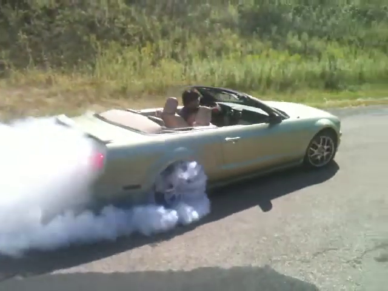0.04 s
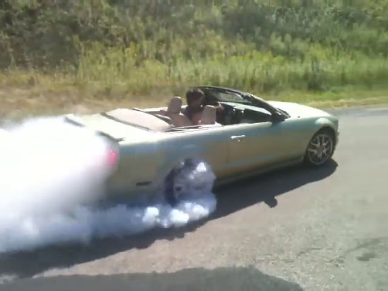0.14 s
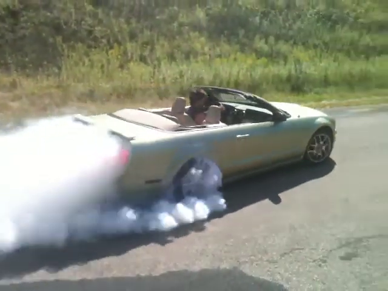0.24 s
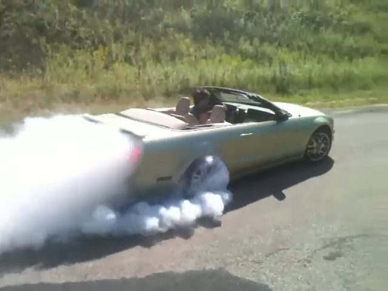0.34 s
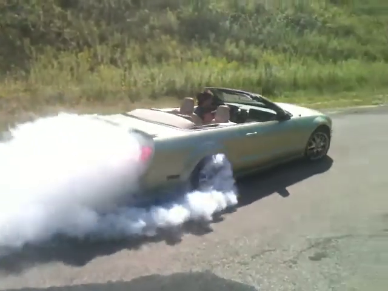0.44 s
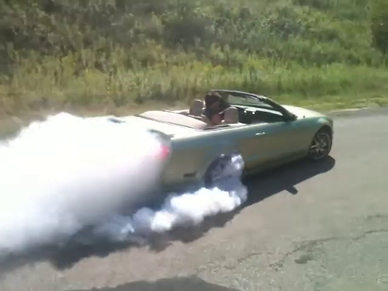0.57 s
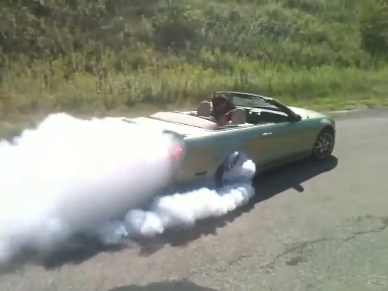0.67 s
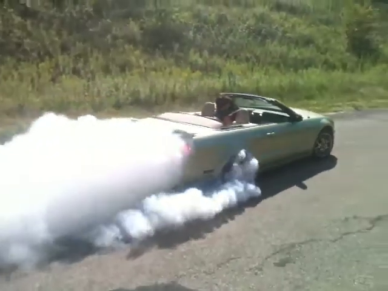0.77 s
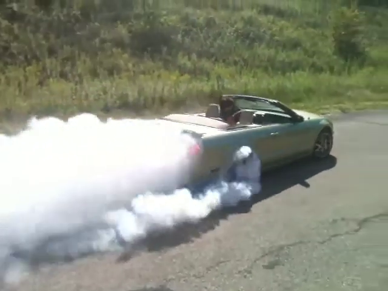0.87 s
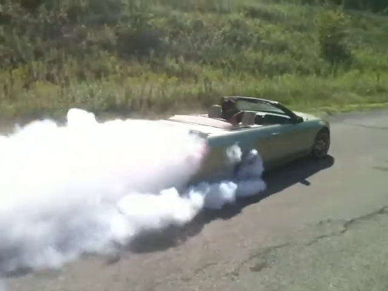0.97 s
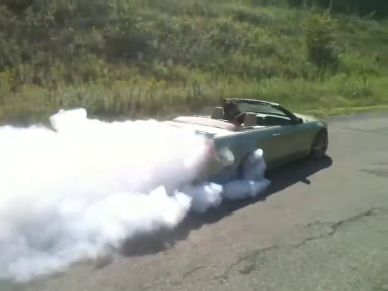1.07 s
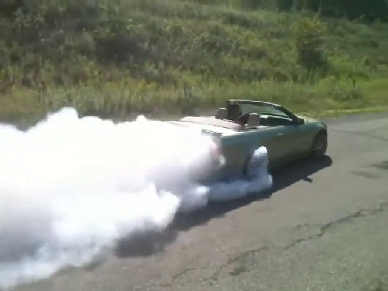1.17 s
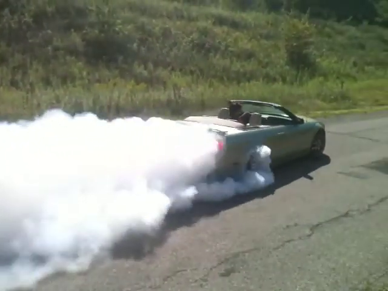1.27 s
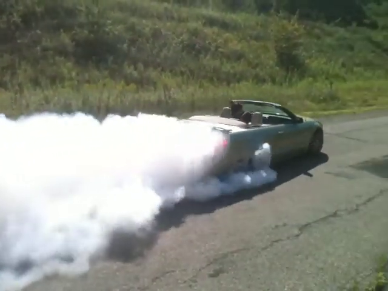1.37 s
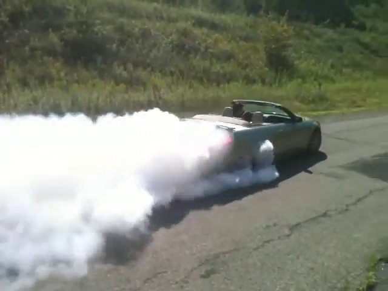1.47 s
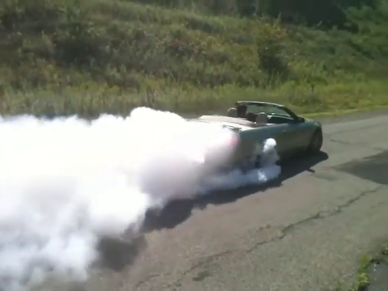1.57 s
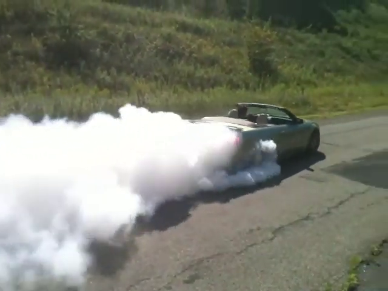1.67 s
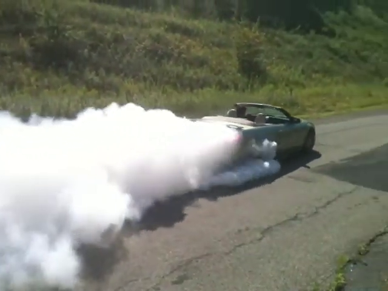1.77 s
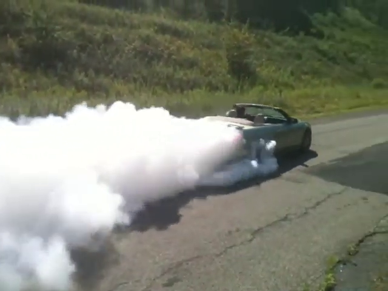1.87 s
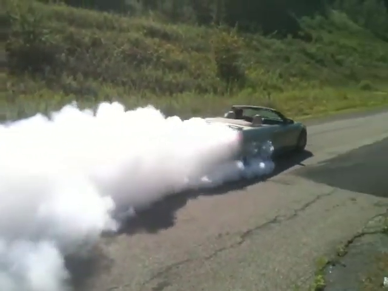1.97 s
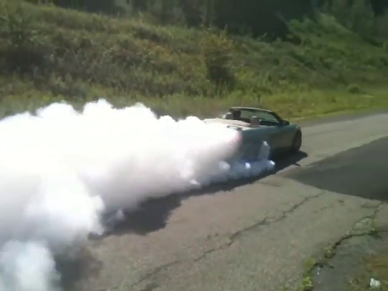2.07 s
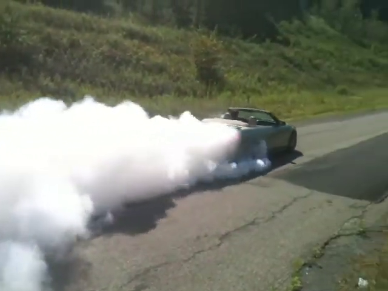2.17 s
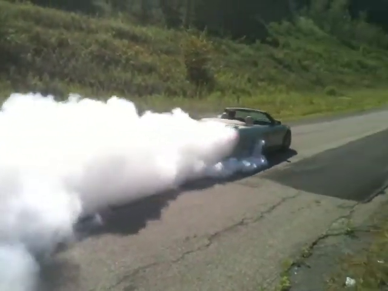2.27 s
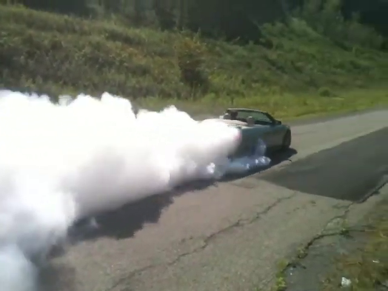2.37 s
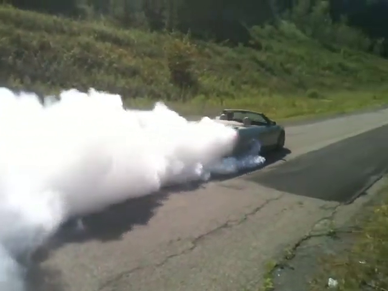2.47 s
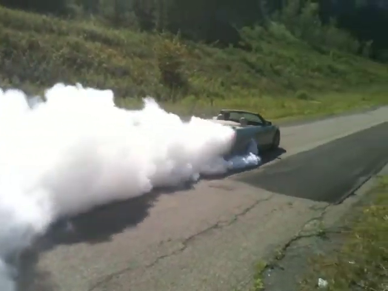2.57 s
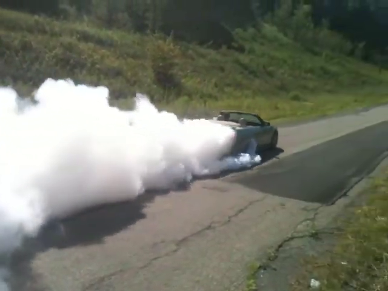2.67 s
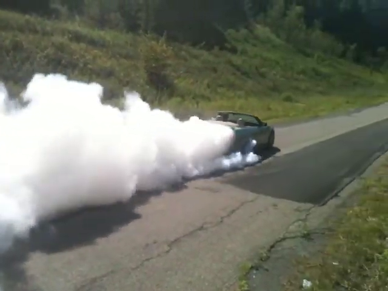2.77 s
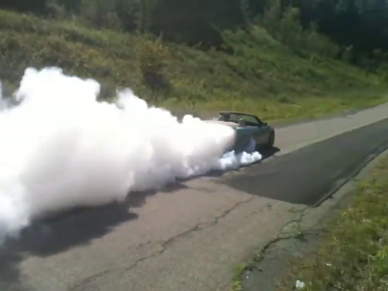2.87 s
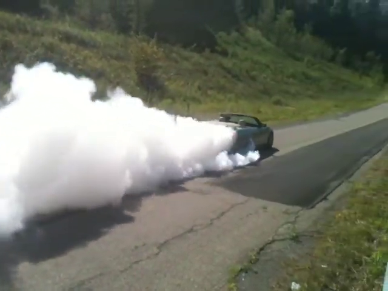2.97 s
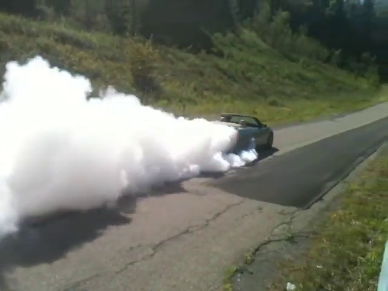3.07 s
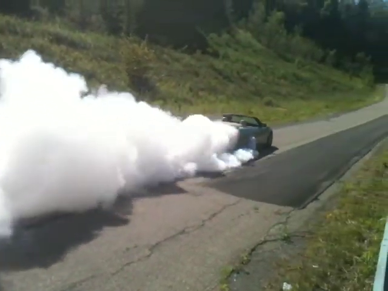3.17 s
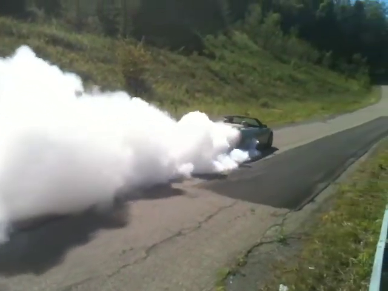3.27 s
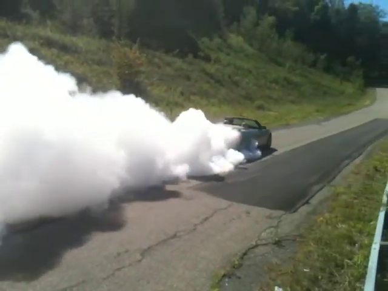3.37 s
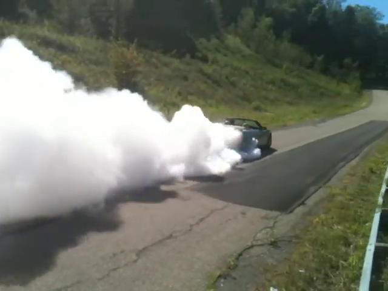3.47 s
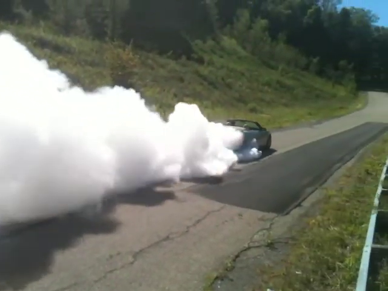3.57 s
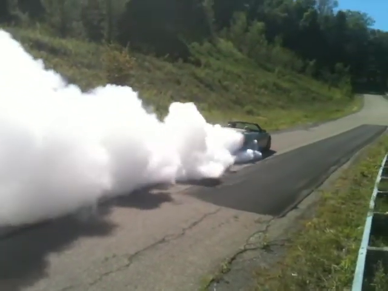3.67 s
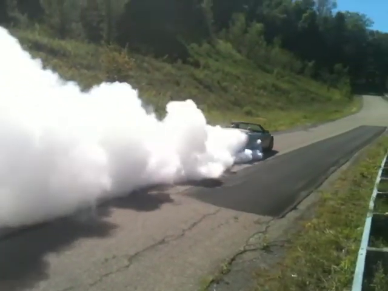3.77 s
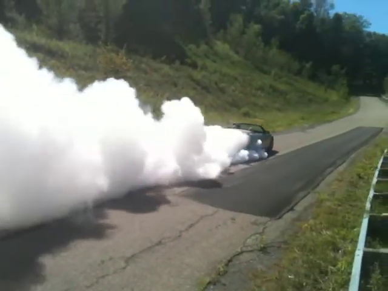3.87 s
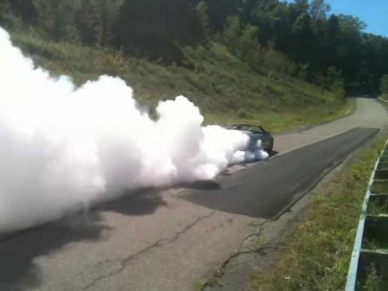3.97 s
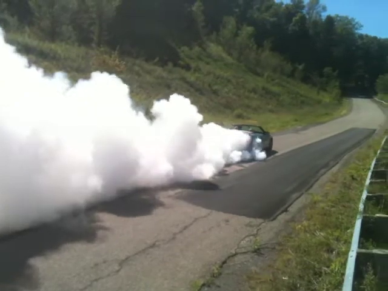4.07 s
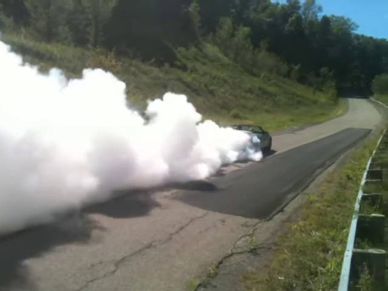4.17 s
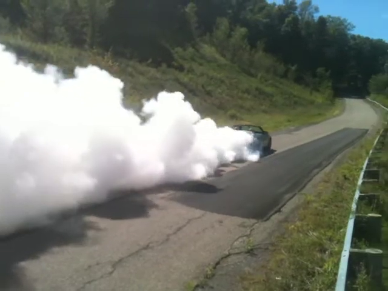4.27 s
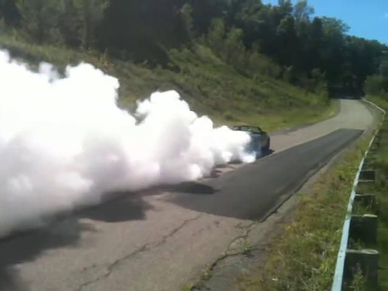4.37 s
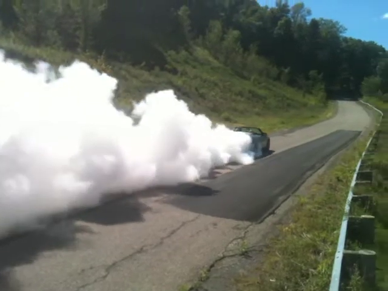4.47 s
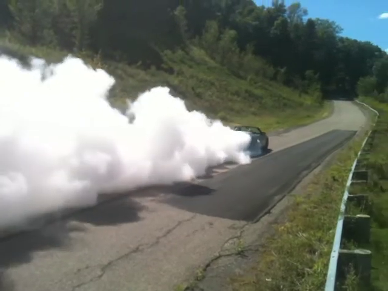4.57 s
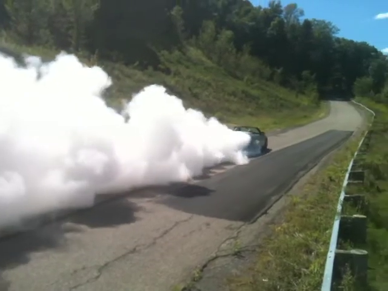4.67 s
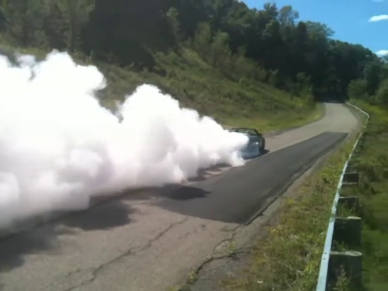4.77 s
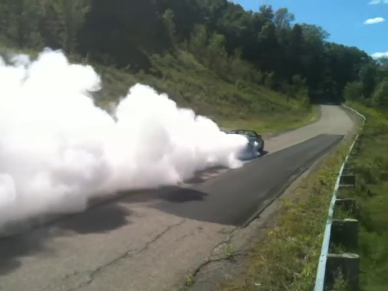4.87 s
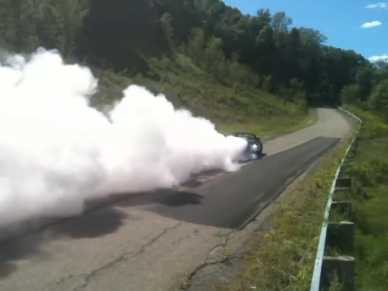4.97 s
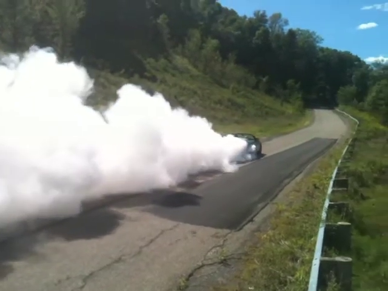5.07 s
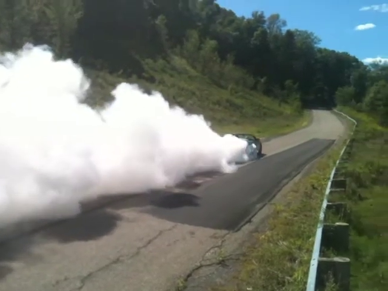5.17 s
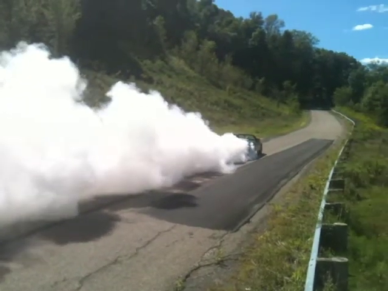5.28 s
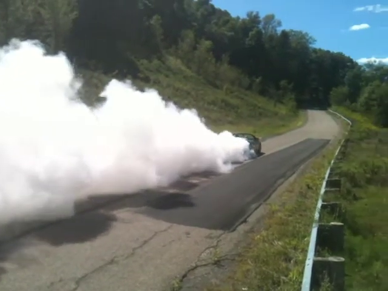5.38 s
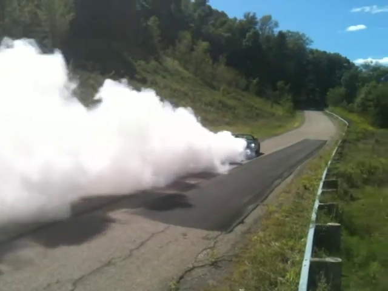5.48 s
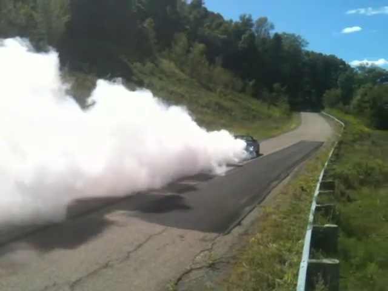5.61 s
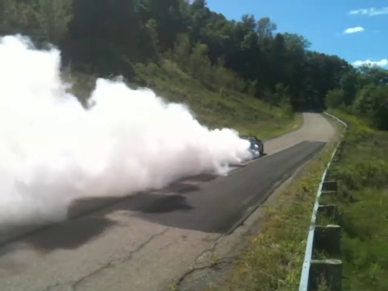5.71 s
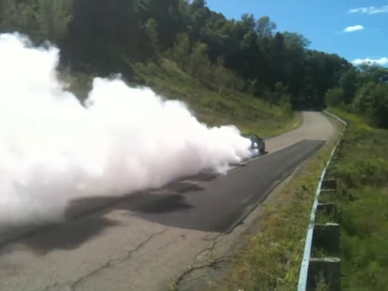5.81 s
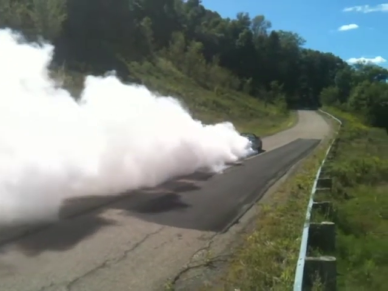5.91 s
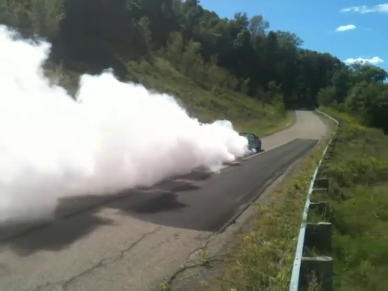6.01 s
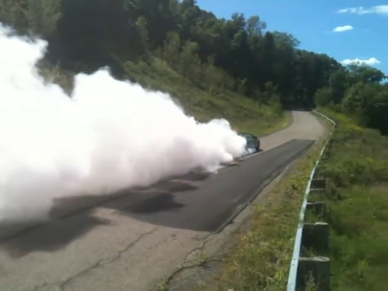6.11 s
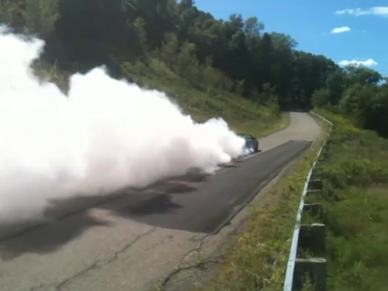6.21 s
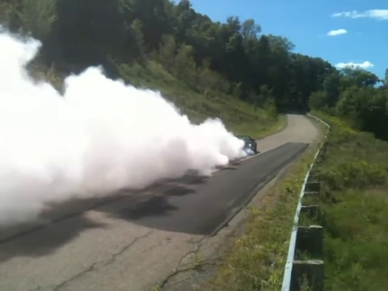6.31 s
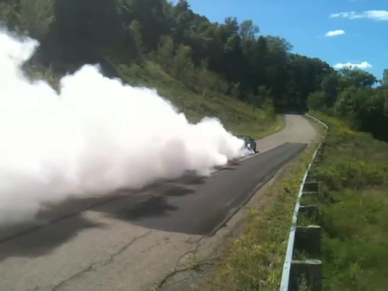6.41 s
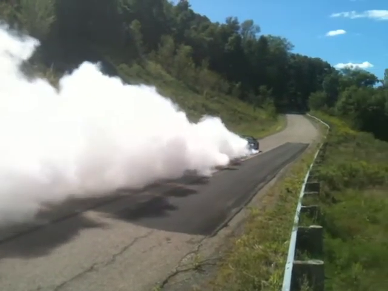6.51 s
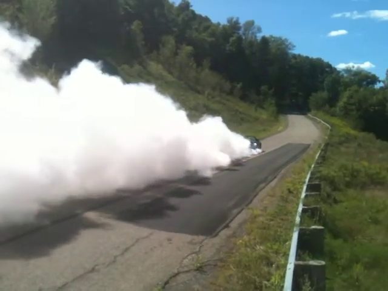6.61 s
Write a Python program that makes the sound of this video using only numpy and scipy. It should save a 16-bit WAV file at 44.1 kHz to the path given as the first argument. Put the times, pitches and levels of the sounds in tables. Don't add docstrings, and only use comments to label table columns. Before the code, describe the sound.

A loud, lumpy V8 held at high revs starts at full force, close and distorted, its spinning tyres squealing and scrubbing. Sharp ragged pops ride on the exhaust for the first few seconds. As the rear turns towards the microphone the roar changes colour and the squeal stands out more; then everything dwindles down the road in dry open air, with very faint insects and leaves beneath.

```python
import sys
import numpy as np
from scipy import signal
from scipy.fft import rfft, irfft, next_fast_len
from scipy.io import wavfile
from scipy.ndimage import uniform_filter1d, map_coordinates

SR = 44100
rng = np.random.default_rng(int(sys.argv[2]) if len(sys.argv) > 2 else 0)


def dump(signal):
    limited = np.clip(np.atleast_2d(signal).T, -1, 1)
    pcm = np.round(limited * 32767).astype(np.int16)
    wavfile.write(sys.argv[1], SR, pcm)


def convert_level_to_amplitude(level_db):
    exponent = np.asarray(level_db, float) / 20
    return 10 ** exponent


N = 293265
T = np.arange(N) / SR

# t/s, engine cycle f/Hz, extra path from far tailpipe/m, level/dB, brightness/(dB per octave)
DRIVE = [(0.0, 49.42, 0.95, 2.5, -3.5), (0.6, 48.57, 0.71, 4, 1), (0.9, 47.98, 0.74, 4, 0.2),
         (1.2, 47.6, 0.71, 3, 1.3), (1.5, 47.26, 0.63, 3, 1.2), (1.8, 46.98, 0.47, 3, 1),
         (2.1, 46.97, 0.34, 3.5, 0.5), (2.5, 46.45, 0.32, 3, 1.3), (2.87, 46.58, 0.24, 1.3, 1.4),
         (3.03, 45.84, 0.232, 1.1, 0.9), (3.3, 46.01, 0.205, -0.55, 0.3), (4.0, 45.34, 0.12, -1.4, 0.5),
         (4.5, 44.44, 0.036, -3, 0.5), (5.0, 43.75, -0.04, -5, -0.9), (5.5, 43.46, -0.072, -6.5, -1),
         (6.0, 43.23, -0.053, -8, -1), (6.3, 43.6, -0.059, -9.5, -2), (6.65, 44.3, 0.009, -8.5, 1)]
# t/s, distance/m
DISTANCE = [(0, 4.34), (.8, 5.66), (1.5, 9.7), (2.3, 10.5), (2.9, 15.7), (3.7, 14.7), (4.3, 18.9),
            (5.2, 25.4), (6, 29.3), (6.65, 31.2)]
# near pipe level/dB, far pipe level/dB, far pipe's lead/turns
PIPE_ORDERS = [(-50.5, -50, .17), (-27.5, -26.5, 0.42), (-34.5, -27, 0.88), (-33.5, -29.5, .49),
               (-45.5, -27, .67), (-43.5, -30, 0.0092), (-21.5, -20.5, 0.92), (-35, -29.5, 0.36),
               (-37.5, -38.5, 1), (-37, -41, 0.9), (-30.5, -37.5, .84), (-41.5, -37.5, 0.5),
               (-32.5, -39.5, 0.9), (-47.5, -37, 0.5), (-31.5, -38, .67), (-36, -55, 0.48),
               (-41.5, -52, .75), (-39.5, -41.5, .59), (-41.5, -49.5, 0.65), (-45, -48.5, .68),
               (-43, -54, 0.46), (-49, -60, .49), (-46.5, -53.5, .61), (-43, -60, 0.51)]
# change of near pipe level/dB, change of far pipe level/dB
SIDE_CHANGES = [(-1.5, -0.8), (1, -3), (1.5, -5.5), (0.5, 5), (-.5, -0.5), (-1.5, -7.5), (2.5, -1),
                (1.2, 1.5), (1.3, -4), (-3.5, -13.5), (-1, 6), (-7, 1), (-1.7, 4), (5.5, 2.5), (-4, -12.5),
                (5.5, 7), (1.5, -9), (5, -12.5), (8.5, 18.5), (2.5, 3), (-3.8, -15.5), (2, 3.5), (4.5, 1),
                (5, -1.3)]
FIRING_STRENGTHS = [3, -2.8, -0.8, -3.5, -0.5, -2, -3.5, -0.8]
# f/Hz, level/dB
ROAR_SIDE = [(60, -42.5), (110, -30), (250, -10.5), (500, -16.5), (900, -16.5), (1400, -18.5), (1700, -25),
             (2100, -27), (2500, -39.5), (3000, -56)]
ROAR_BEHIND = [(60, -41), (110, -23), (250, -13.5), (500, -16.5), (750, -15.5), (1030, -21), (1400, -16),
               (1500, -24), (1630, -36.5), (1850, -23), (2080, -28.5), (2280, -45), (2600, -43.5),
               (3000, -68.5)]
# f/Hz, level/dB
HISS_SIDE = [(1000, -23), (1500, -4), (2400, -1.5), (3300, -1.5), (4200, -5), (5500, -12.5), (7500, -19.5),
             (10000, -39.5)]
HISS_BEHIND = [(1500, -32), (2000, -2.5), (2300, -7.5), (2650, -4.5), (3080, -7.5), (3550, 2), (3950, -2),
               (4200, -4), (4450, -8), (4750, -8), (5050, -11), (5350, -15), (6200, -14.5), (7400, -30)]
# t/s, lift level/dB, length/s
SMOKE_GAPS = [(.28, 2, .06), (.45, 2.5, .06), (.92, 1, .05), (2.26, 2.5, .04), (2.67, 2, 0.054),
              (2.8, 2, 0.026), (3.2, 2.5, 0.058), (3.66, 2, 0.056), (4.1, 7, .045), (4.5, 5, .025),
              (4.62, 4, .05), (5.07, 4.5, .05), (5.53, 2.5, .04), (6.19, 4, .04), (6.52, 5, 0.054)]
# t/s, lift level/dB, length/s
THIN_SMOKE = [
    (1.4, 0.5, .4),
    (3.7, 3, .3),
    (5.1, 2.5, .15),
    (6.4, 0, .2),
]
# f/Hz, level/dB
SCRUB_SIDE = [(4000, -18.5), (5200, -1.5), (7000, -5.5), (8500, -9), (11000, -8.5), (13200, -11.5),
              (14500, -16.5), (15800, -26)]
SCRUB_BEHIND = [(4000, -21.5), (5200, -3), (6900, -6.5), (7400, -12), (7900, -8), (8600, -10),
                (8900, -17.5), (9300, -7), (11000, -12.5), (13200, -13.5), (13700, -23.5), (14800, -24),
                (15100, -12.5), (15800, -29.5)]
# t/s, lift level/dB, length/s
TYRE_BITES = [(.11, 3.5, 0.051), (.28, 6, 0.046), (.47, 9, 0.042), (.93, 7, 0.054), (1.17, 3, 0.09),
              (1.48, 4.5, 0.097), (1.77, 7, .06), (1.87, 3.5, 0.041), (1.98, 7.5, 0.039), (2.6, 1, 0.086),
              (2.8, 5, .15), (3.04, 6, 0.074), (3.9, 3.5, .1), (4.5, 5, 0.048)]
# f/Hz, level/dB
MEADOW_COLOUR = [(60, -37.5), (300, -6.5), (2000, -7.5), (6800, -5.5), (7400, -11.5), (8300, 5), (9000, -3),
                 (13200, -12), (13800, -21.5), (14800, -23), (15100, -15.5), (15800, -23)]
# place in the cycle/turns, start t/s,
# slightly eased t/s, end t/s, level/dB
SHOCK_FRONTS = [
    (0.55, .5, 1.5, 3.2, -3),
    (.615, 0.25, 1.1, 2.5, 1),
    (.68, 0.3, 1.2, 3.7, -0.5),
]
# t/s, level/dB
STRAY_SHOCKS = [
    (2.805, -3),
    (2.66, -5),
]
# f/Hz, level/dB
SHOCK_COLOUR = [(600, -16.5), (1300, 4), (2500, -9.5), (4500, -18.5), (8000, -30), (15000, -44.5)]

TAIL_SWINGS_S = (0.65, 2.04)


def unit(x):
    return x / np.sqrt(np.mean(x ** 2) + 1e-20)


def curves(rows):
    times, *columns = np.transpose(rows)
    return [np.interp(T, times, column) for column in columns]


def wobble(rate_hz):
    knots = rng.standard_normal(int(N * rate_hz / SR) + 4)
    return map_coordinates(knots, [np.arange(N) * rate_hz / SR])


def filtered(x, response):
    size = next_fast_len(N + 8192)
    spectrum = rfft(x, size) * response(np.fft.rfftfreq(size, 1 / SR))
    return irfft(spectrum, size)[..., :N]


def coloured(x, points):
    f, db = np.transpose(points)
    return unit(filtered(x, lambda hz: convert_level_to_amplitude(np.interp(np.log(hz + 1), np.log(f), db, -120, -120))))


def patchy(depth_db):
    z = signal.stft(rng.standard_normal(N + 512), nperseg=512)[2]
    field = uniform_filter1d(rng.standard_normal(z.shape), size=6, axis=0)
    field = uniform_filter1d(field, size=5, axis=1)
    return signal.istft(z * convert_level_to_amplitude(depth_db * unit(field)), nperseg=512)[1][:N]


def swells(rows):
    return sum(db * np.exp(-((T - s) / length) ** 2) for s, db, length in rows)


def receding(loss_db_per_m):
    metres, = curves(DISTANCE)
    return -20 * np.log10(metres / metres[0]) - loss_db_per_m * (metres - metres[0])


def from_tail(x, side, behind):
    turn = np.interp(T, TAIL_SWINGS_S, [0, np.pi / 2])
    return np.cos(turn) * coloured(x, side) + np.sin(turn) * coloured(x, behind)


def bursts(cycles, steady, scatter_db, patchy_db):
    firing = len(FIRING_STRENGTHS) * cycles
    count = firing.astype(int)
    chance = np.clip(rng.standard_normal(count[-1] + 1), -2, 2)[count]
    size = convert_level_to_amplitude(np.take(FIRING_STRENGTHS, count, mode="wrap") + scatter_db * chance)
    return patchy(patchy_db) * (steady + size * np.sin(np.pi * firing) ** 2)


def exhaust(cycles):
    sound_speed = 343
    hardest_place, aimed_s = 0.73, 1.9
    silencer_order, silencer_turns = 9.5, (0.48, 0.17)
    cycle_hz, gap_m, level_db, bright_db = curves(DRIVE)
    lag = cycle_hz * gap_m / sound_speed
    side_on = np.interp(T, [0.7, 1.7], [1, 0])
    uneven = 0.0023 * wobble(20)
    out = np.zeros(N)
    for order, row in enumerate(np.hstack([PIPE_ORDERS, SIDE_CHANGES]), 2):
        near_db, far_db, lead, near_side_db, far_side_db = row
        near = convert_level_to_amplitude(near_db + near_side_db * side_on)
        far = convert_level_to_amplitude(far_db + far_side_db * side_on) * np.exp(2j * np.pi * (lead - order * lag))
        pair = near + far
        pair *= np.exp(-1j * np.angle(pair[round(aimed_s * SR)]))
        spread = -0.15 + 0.006 * order * rng.standard_normal()
        spread += (order > silencer_order) * silencer_turns[order % 2]
        blur = wobble(30) + (order / 22) ** 2 * wobble(70)
        drift = (0.003 + 0.0008 * side_on) * order * blur
        phase = 2 * np.pi * (order * (cycles - hardest_place + uneven) + spread + drift)
        waver = convert_level_to_amplitude(bright_db * np.log2(order / 8) + (0.2 + 0.08 * order) * wobble(11))
        out -= waver * (pair.real * np.cos(phase) - pair.imag * np.sin(phase))
    return np.sqrt(2) * convert_level_to_amplitude(level_db) * out


def rasp(cycles):
    exhaust_db = curves(DRIVE)[2]
    roar_db = -28.5 + 0.45 * exhaust_db + 0.63 * wobble(14)
    roar_db += np.interp(T, [0.21, 1.03], [6.5, 0])
    roar_db += np.interp(T, [5.4, 5.2], [0, -1.5])
    hiss_db = -37 + receding(loss_db_per_m=0.15) + 0.6 * wobble(16)
    hiss_db += 0.47 * swells(SMOKE_GAPS) + swells(THIN_SMOKE)
    roar = from_tail(bursts(cycles, steady=1.6, scatter_db=1.0, patchy_db=0.27), ROAR_SIDE, ROAR_BEHIND)
    hiss = from_tail(bursts(cycles, steady=2.9, scatter_db=3.0, patchy_db=2.0), HISS_SIDE, HISS_BEHIND)
    return convert_level_to_amplitude(roar_db) * roar + convert_level_to_amplitude(hiss_db) * hiss


def tyres():
    centre_hz = 846 + 70.08 * np.exp(-T / 0.6)
    squeal_db = -28 + receding(loss_db_per_m=0.5) + swells(TYRE_BITES) + 1.7 * wobble(9)
    squeal_db += np.interp(T, TAIL_SWINGS_S, [0, 8.5])
    squeal = np.zeros(N)
    for detune in (-0.061, -0.025, 0.03, 0.08):
        slip_hz = centre_hz * (1 + detune + 0.02 * wobble(12) + 0.05 * wobble(150))
        squeal += convert_level_to_amplitude(1.2 * wobble(20)) * np.sin(2 * np.pi * np.cumsum(slip_hz) / SR)
    scrub_db = -47 + receding(loss_db_per_m=0.35) + swells(SMOKE_GAPS)
    grit = patchy(depth_db=0.5) * convert_level_to_amplitude(0.96 * wobble(30) + 2.3 * wobble(600))
    scrub = from_tail(grit, SCRUB_SIDE, SCRUB_BEHIND)
    return convert_level_to_amplitude(squeal_db) * unit(squeal) + convert_level_to_amplitude(scrub_db) * scrub


def meadow():
    return convert_level_to_amplitude(-74.5) * coloured(patchy(depth_db=-1.5), MEADOW_COLOUR)


def cracks(cycles):
    fronts = np.zeros(N)
    for place, start, eased, end, db in SHOCK_FRONTS:
        at = np.flatnonzero(np.diff(np.floor(cycles - place)))
        aim_times = [start, start + 0.17, eased, end - 0.1, end]
        aim = np.interp(at / SR, aim_times, [0.31, 0.94, 0.73, 0.17, 0.04])
        chance = np.clip(rng.standard_normal(len(at)), -2.5, 1.2)
        fronts[at] = aim * convert_level_to_amplitude(db + 1.1 * chance)
    for s, db in STRAY_SHOCKS:
        fronts[round(s * SR)] = convert_level_to_amplitude(db)
    decay = convert_level_to_amplitude(-60 * np.arange(SR // 200) / SR / 0.0045)
    flare = np.convolve(fronts, decay)[:N]
    return convert_level_to_amplitude(-40) * coloured(0.86 * flare * rng.standard_normal(N) - fronts, SHOCK_COLOUR)


def scene():
    cycles = np.cumsum(curves(DRIVE)[0]) / SR
    mix = exhaust(cycles) + rasp(cycles) + tyres() + meadow() + cracks(cycles)
    return mix[None]


def band_limit(x):
    return signal.sosfilt(signal.butter(12, 15780, fs=SR, output="sos"), x)


def record(dry):
    x = filtered(dry, lambda hz: 1 / (1 + (75 / (hz + 1)) ** 8))
    near = np.clip((1.68 - T) / 0.04, 0, 1)
    beat = filtered(near * x ** 2, lambda hz: (hz > 12) / (1 + (hz / 65) ** 8))
    x = x + convert_level_to_amplitude(-16.5) * beat
    x = x / (1 + np.abs(x / 0.71) ** 12) ** (1 / 12)
    x = x * np.clip((N - np.arange(N)) / (0.006 * SR), 0, 1)
    return band_limit(x)


dry = scene()
out = record(dry)
dump(out)
```